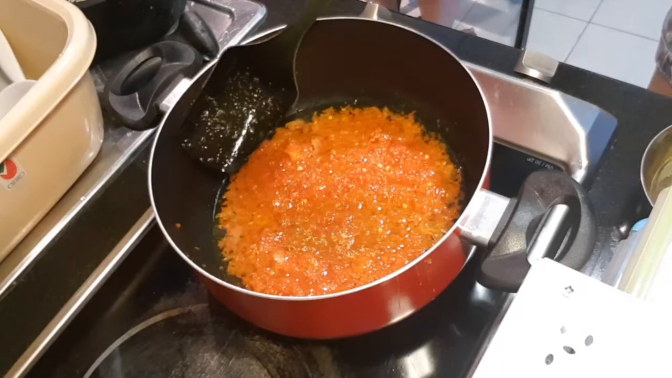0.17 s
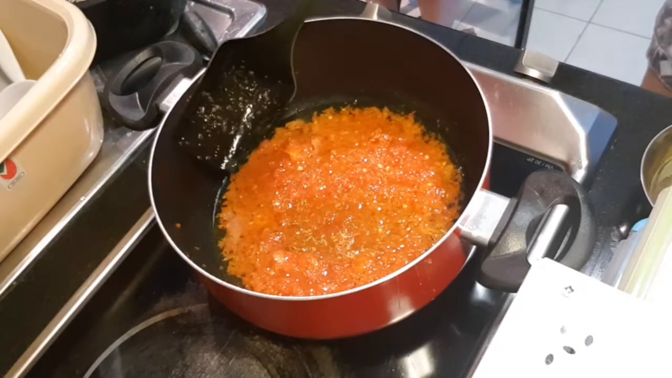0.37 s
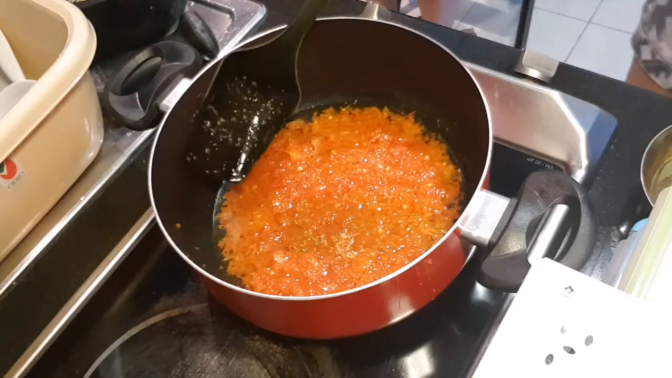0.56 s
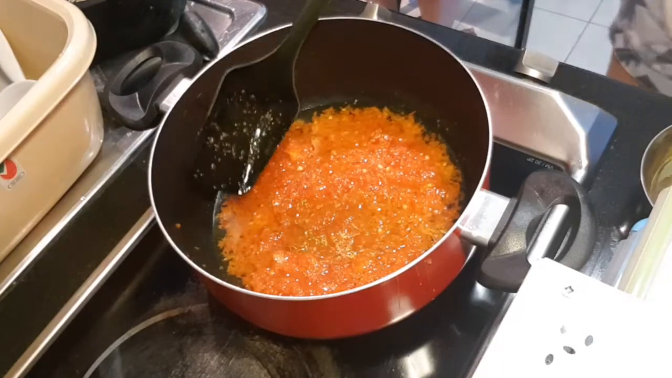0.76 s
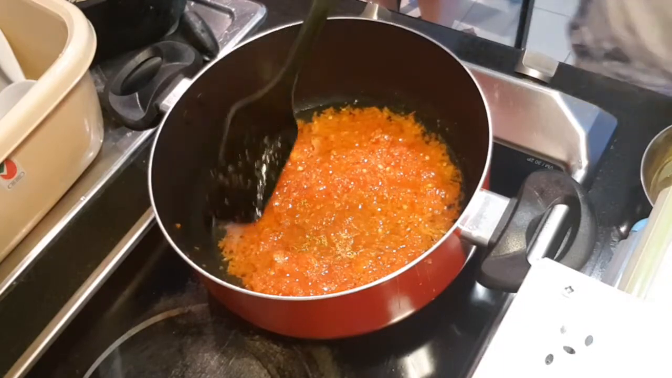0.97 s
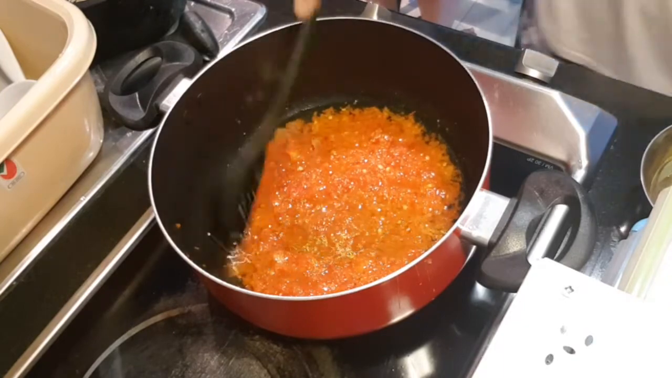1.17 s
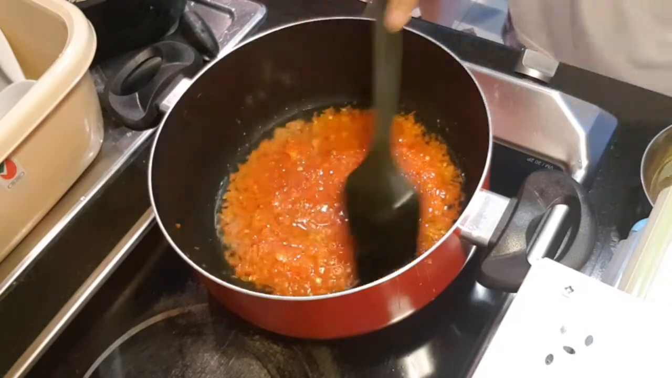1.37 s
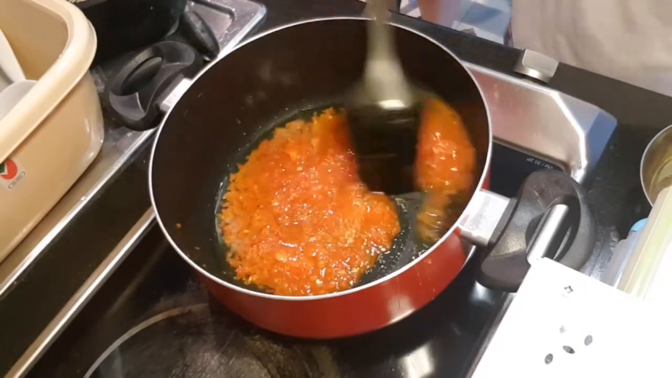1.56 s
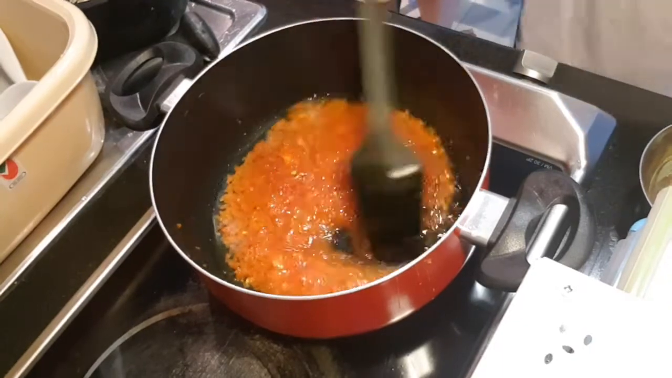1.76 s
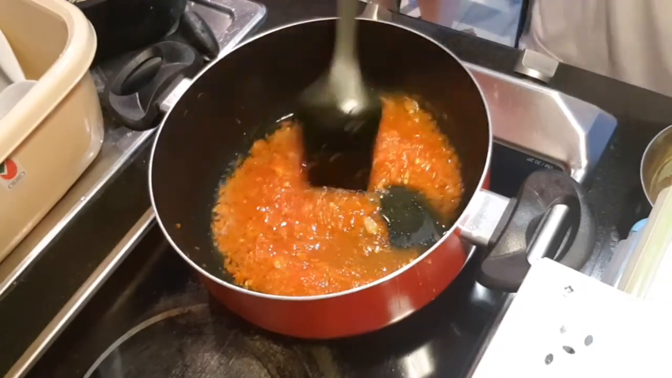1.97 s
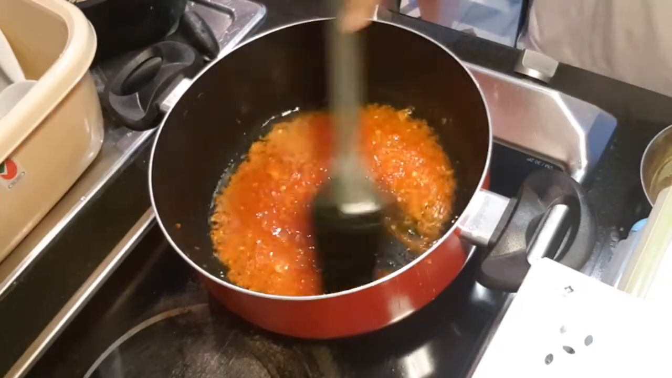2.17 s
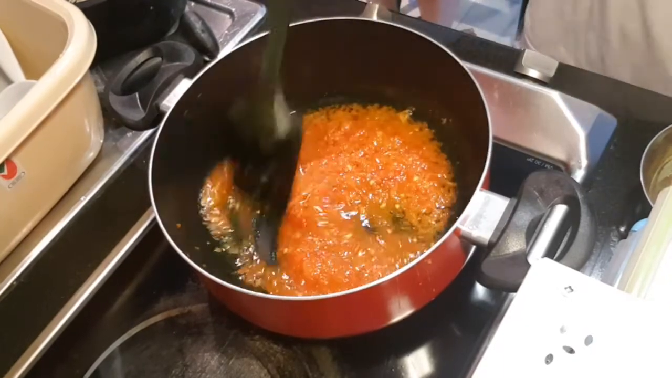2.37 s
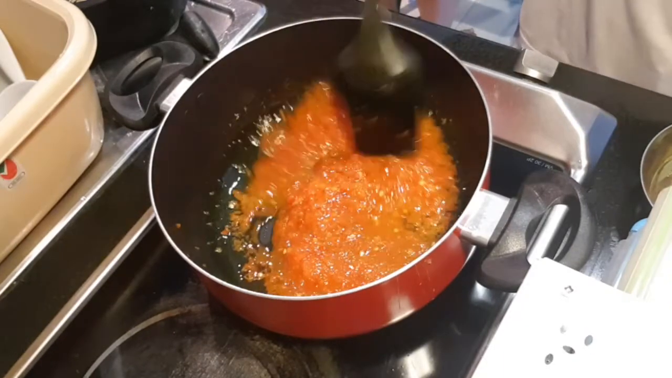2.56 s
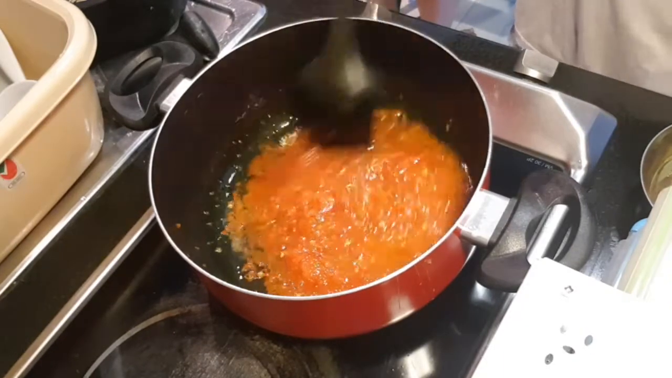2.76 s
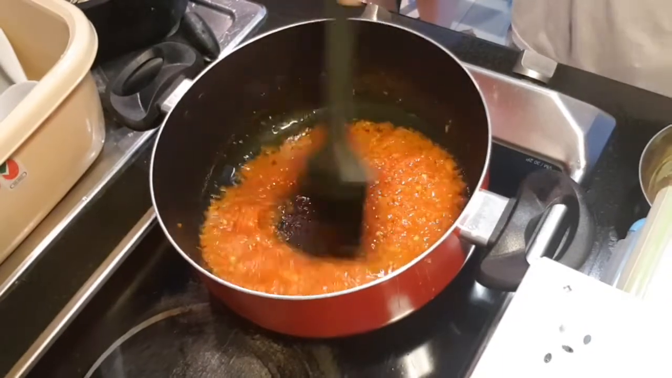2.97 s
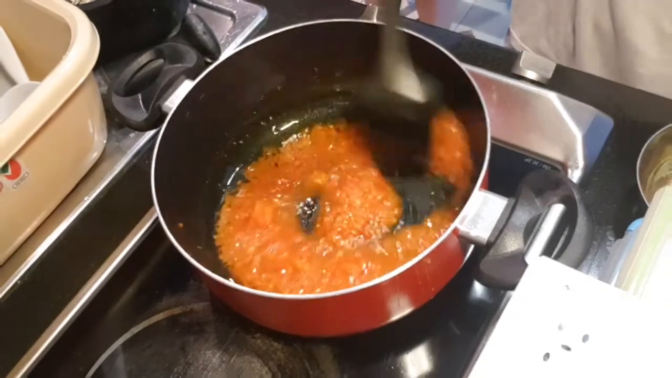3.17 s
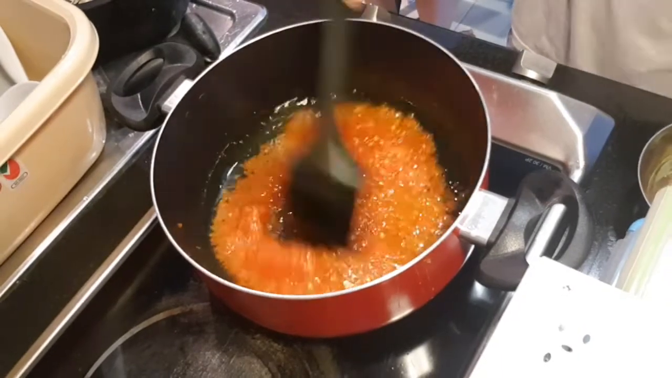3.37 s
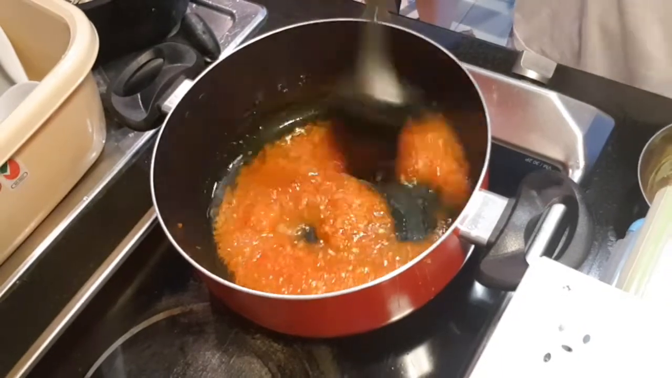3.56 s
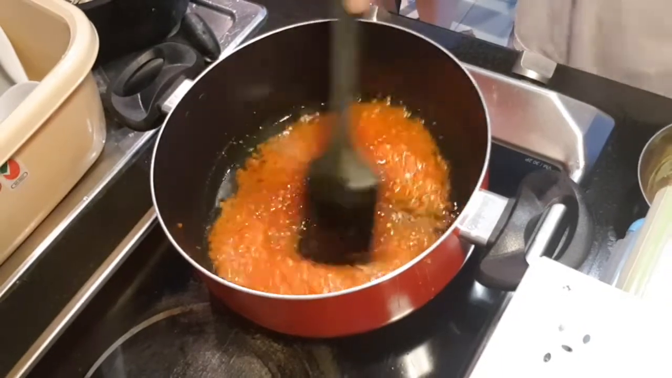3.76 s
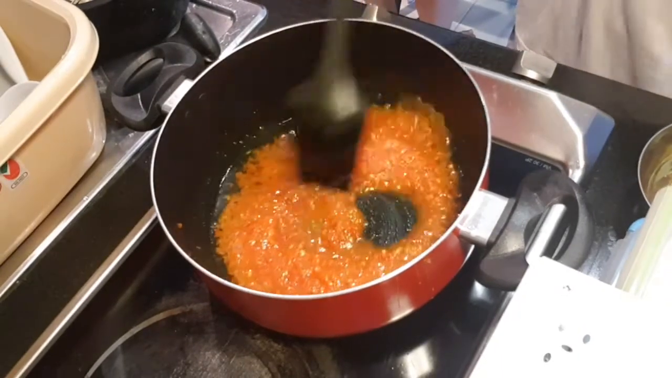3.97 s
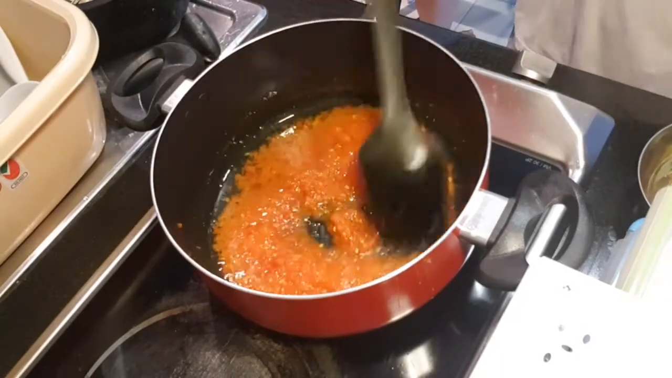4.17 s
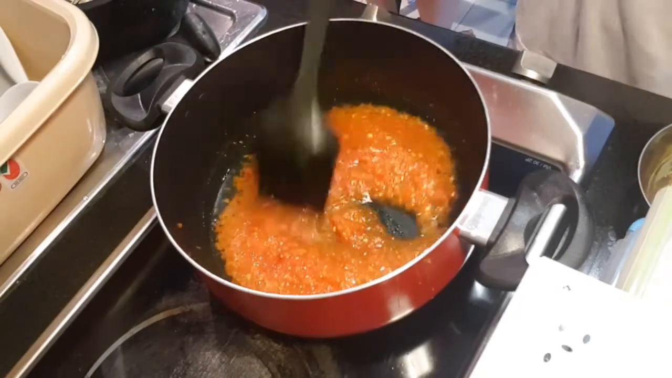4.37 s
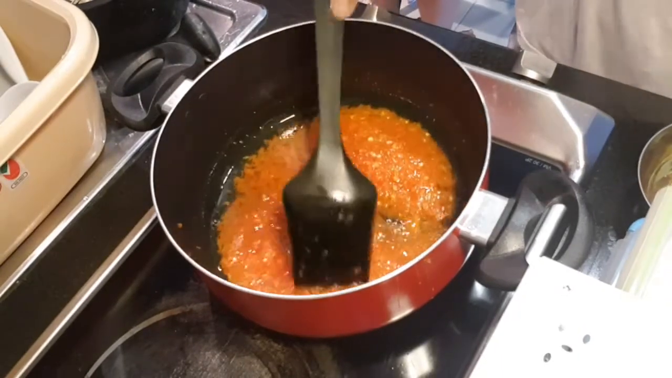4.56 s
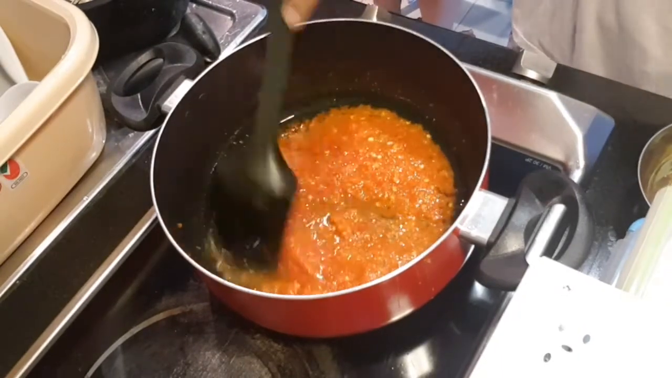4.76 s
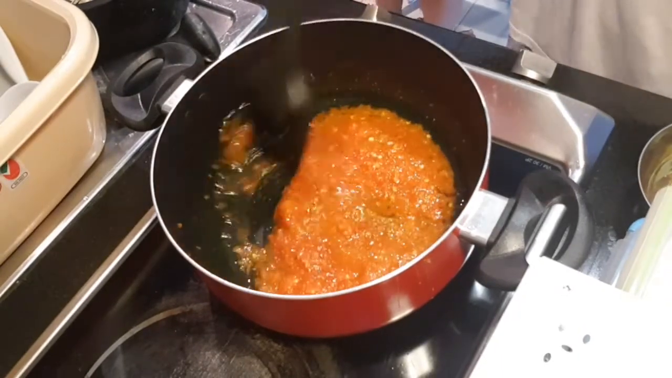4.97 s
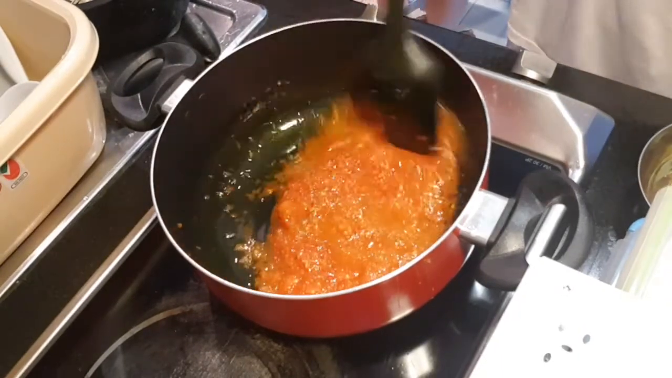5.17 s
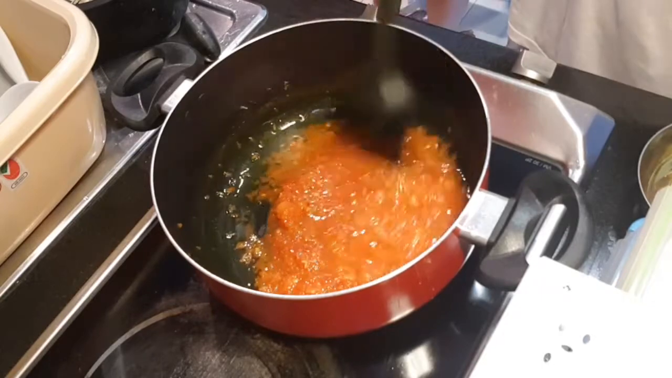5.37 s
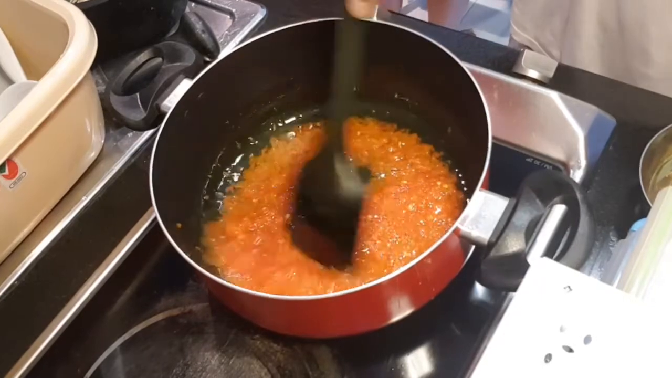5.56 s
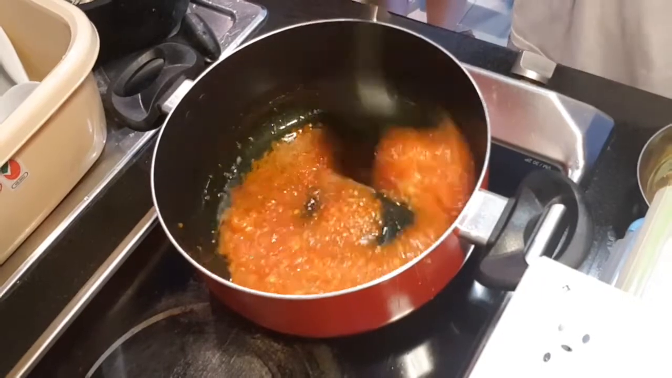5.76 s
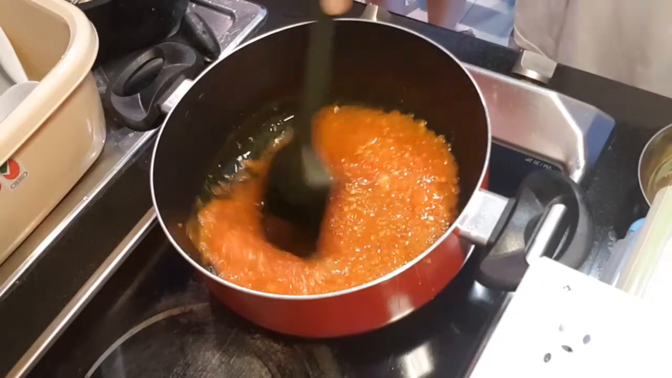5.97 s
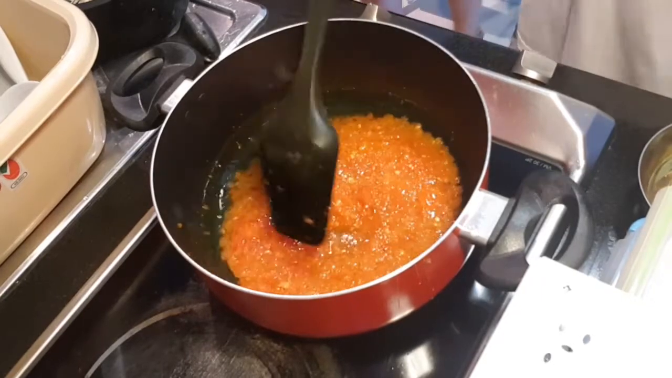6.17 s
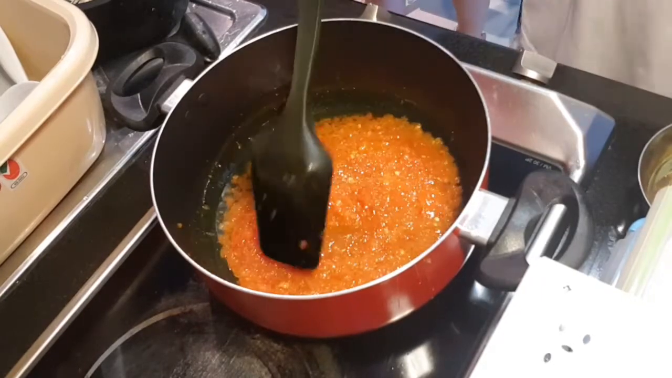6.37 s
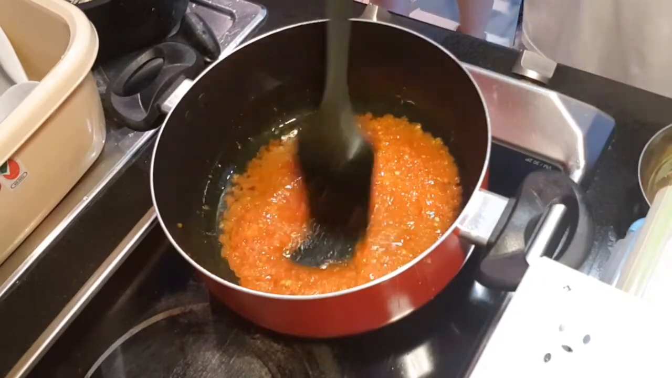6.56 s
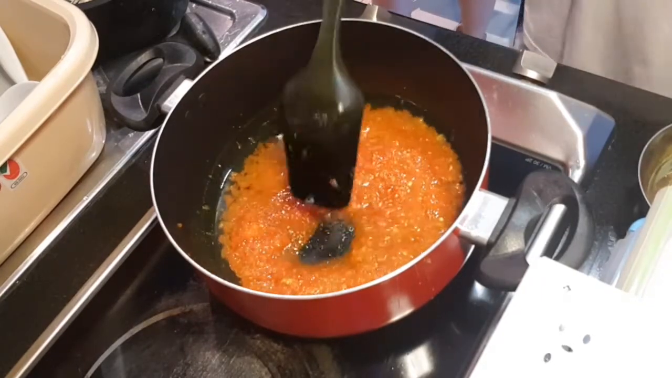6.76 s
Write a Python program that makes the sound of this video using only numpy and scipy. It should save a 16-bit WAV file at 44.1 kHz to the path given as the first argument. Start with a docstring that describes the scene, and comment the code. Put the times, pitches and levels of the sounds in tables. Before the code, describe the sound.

After a second of gentle frying, a nylon spatula knocks sharply in a nonstick pot and begins quick scraping strokes through thick paste. The sizzle flares, then subsides as stirring continues, with hollow clunks, brief bright clacks and wet squelches. Late on the strokes thin out to a soft knock and drag. A fan rumbles low in the home kitchen; close stereo pickup, leaning slightly left.

```python
"""Kitchen hob: a nylon spatula stirs a paste frying in a nonstick pot, heard by two microphones.
Rubbing strokes: dense random clicks drive damped pot modes, plus noise in soft bands.
Knocks: decaying sines of pot and hob with a burst of noise. Spits: band-passed noise puffs.
Sizzle: clicks and noise in flickering bands. Kitchen: shaped noise, fan rumble and faint hiss."""
import sys
import numpy as np
from scipy import signal
from scipy.fft import rfft, irfft, next_fast_len
from scipy.io import wavfile
from scipy.ndimage import uniform_filter1d

SR = 44100
rng = np.random.default_rng(int(sys.argv[2]) if len(sys.argv) > 2 else 0)


def pcm_store(signal):
    """Save signal as 16-bit PCM."""
    levels = np.round(np.clip(np.atleast_2d(signal), -1, 1) * 32767)
    wavfile.write(sys.argv[1], SR, levels.astype(np.int16).T)


N = 300321
T = np.arange(N) / SR
STEP = 32  # samples
SLOW_S = T[::STEP]  # coarse clock for gains
PAD = next_fast_len(N)
HZ = np.maximum(np.fft.rfftfreq(PAD, 1 / SR), 1)

# Blade strokes; levels are nominal, before slow random unevenness:
# touch_s, speed_up_s, slow_down_s, touch_softening_db, lift_softening_db,
# rub_db, low_modes_db, hiss_db (all at full speed), squelch_db (at touch),
# low_touch_hz, low_full_speed_hz, high_touch_hz, high_lift_hz, high_strength_db
STROKES = [(1.137, 0.11, 0.11, 16.4, 8.8, -41.5, -40, -63, -70, 530, 383, 1510, 2380, 4),
           (1.41, 0.061, .03, 5.7, 6.1, -46.5, -48, -49.5, -56, 489, 880, 2100, 2190, -0.5),
           (1.645, 0.0087, 0.041, 5.9, 6.6, -48, -46.5, -44.5, -58, 612, 610, 2070, 1990, -2),
           (1.729, 0.063, 0.037, 7.8, 4, -39.5, -46.5, -46.5, -47, 1120, 1160, 2810, 2290, 0),
           (1.921, 0.12, 0.045, 18, 6, -35.5, -46.5, -44.5, -58, 900, 960, 1730, 1940, -5.5),
           (2.104, 0.0075, 0.02, 1, 5.2, -39.5, -36, -45.5, -56, 558, 510, 2420, 2320, -3.5),
           (2.174, 0.0054, 0.017, 2, 3.6, -43, -45.5, -49.5, -60, 700, 790, 1620, 1630, -7),
           (2.271, 0.14, 0.051, 13, 5.4, -37.5, -43.5, -45.5, -58, 400, 880, 2750, 2100, 4),
           (3.071, 0.022, 0.012, 10, 8.3, -40.5, -61, -52, -48, 756, 750, 2210, 2290, 3.5),
           (3.215, 0.059, 0.11, 12.6, 10.7, -35, -41.5, -45.5, -38.5, 640, 1080, 2760, 1960, -1.5),
           (3.574, 0.1, 0.073, 14.4, 7.7, -35, -39, -47.5, -51, 565, 655, 1830, 2700, -0.5),
           (3.93, 0.11, 0.062, 15, 4.3, -38, -40, -52, -49, 690, 590, 1860, 2490, -2.5),
           (4.138, 0.071, 0.039, 14.5, 14, -38.5, -52.5, -48.5, -44, 770, 930, 1740, 2600, -0.5),
           (4.289, 0.066, 0.11, 13.4, 6.3, -38, -40.5, -54, -48, 680, 586, 1700, 2660, -2),
           (4.67, .015, 0.033, 0.67, 4, -56.5, -48, -74, -70, 415, 415, 2600, 2290, -1.5),
           (4.748, 0.039, 0.087, 15, 2.3, -40, -39.5, -53, -58, 1100, 733, 2730, 2370, -1.5),
           (4.855, 0.065, 0.13, 4.9, 5.2, -37, -44, -50, -64, 800, 1136, 1900, 1620, 2.5),
           (5.297, 0.012, 0.0069, 6.5, 1, -55, -59, -58, -68, 695, 800, 1700, 1700, -2.5),
           (5.318, .006, 0.015, 2.8, 3.7, -34, -36.5, -51, -46, 775, 780, 1650, 1650, 1.5),
           (5.481, 0.022, 0.025, 6, 3.9, -56.5, -52, -62, -55, 547, 566, 1960, 2000, 3.5),
           (5.765, 0.051, .012, 4.9, 1, -39.5, -41.5, -42.5, -46.5, 692, 1180, 2980, 2720, 0),
           (5.825, 0.0068, 0.044, 3, 1.1, -32.5, -49.5, -40, -60, 1150, 1220, 1740, 1900, 7.5),
           (6.513, 0.0056, 0.13, 6.6, 19, -58.5, -51.5, -62, -60, 395, 408, 2260, 2200, 19.5)]
# Soft drag of the blade through the paste between strokes: time_s, level_db
DRAG = [(1.05, -70.5), (1.35, -60.5), (1.58, -70), (1.9, -66.5), (2.2, -64), (2.55, -61), (2.66, -71.5),
        (2.78, -50), (2.9, -60.5), (3.45, -57.5), (3.55, -69), (3.88, -65.5), (4.3, -72), (4.62, -76),
        (4.7, -62), (5.2, -73.5), (5.45, -73), (5.72, -58.5), (5.95, -60), (6.12, -76.5), (6.81, -79.5)]
# Favoured modes while dragging: low_hz, high_hz
DRAG_HZ = (528, 2040)
# Share of the softening followed by rubbing, low modes, hiss: share [ratio]
SPEED_SHARE = [0.94, 0.78, 0.18]
# Blade knocks, relative levels at the colour points:
# start_s, ring_db, hob_thud_db, pot_floor_db, place_hz (pivot of the ring colour),
# dullness_db_per_oct (drop above the pivot)
KNOCKS = [(0.068, -44.5, -69, -48, 1500, 11), (0.246, -51, -70, -73, 1700, 5),
          (1.099, -53, -47.5, -65, 900, 7), (1.325, -12.5, -31.5, -14, 690, 15.5),
          (1.864, -60, -47, -43, 700, 10), (1.9, -27, -43, -23, 600, 18), (2.174, -38, -43, -22, 1200, 9),
          (2.211, -63, -43, -43, 1200, 3.5), (2.253, -64, -39, -29, 2200, 5.5),
          (2.675, -15.5, -32, -26, 2600, -0.5), (2.717, -24, -28.5, -19.5, 700, 4.5),
          (2.745, -19, -36, -44, 1290, 33), (3.44, -39, -45, -21.5, 700, 6.5),
          (3.577, -46.5, -68, -60, 1200, 0.5), (4.2, -55, -53, -27, 700, 6),
          (4.67, -63, -43, -34, 700, 4.5), (4.745, -41, -56, -31, 700, 5),
          (4.776, -22.5, -39, -40, 700, 15.5), (5.319, -30.5, -36, -63, 1650, 32),
          (5.361, -71, -50, -28.5, 1500, 20), (5.482, -59, -44.5, -77, 1200, 5),
          (5.77, -51.5, -49, -48.5, 2200, -6.5), (6.517, -34.5, -38.5, -19.5, 700, 31)]
# Colour points of a knock: thud, floor, then ring: centre_hz
KNOCK_POINTS_HZ = [130, 300, 700, 1700, 5600]
# Oil spits: start_s, level_db (before the fade), centre_hz, t60_s
SPITS = [(1.633, -19.5, 10750, 0.29), (3.411, -34, 9600, .1), (3.412, -34, 2890, .1),
         (3.413, -35, 4800, .1), (3.443, -37, 9900, 0.091), (4.505, -42.5, 7860, 0.21),
         (6.053, -47, 7100, 0.2), (6.095, -47, 10600, 0.34), (6.158, -44, 3500, 0.17),
         (6.159, -46, 5630, .19), (6.2602, -53, 5310, 0.29), (6.3194, -54.5, 4520, 0.21),
         (6.7403, -54, 4060, 0.29), (6.79, -55.5, 4240, 0.31)]
# Pot and hob modes: mode_hz, struck_rel_db, t60_s (before paste damping), rubbed_rel_db
POT = [(75.2, -10, 0.46, -20), (131.4, 9.5, 0.86, -12), (206.8, -2, 0.34, -2.5), (258.7, -13, 0.61, 2.5),
       (389.2, -7.5, 0.11, 9.5), (497, -15.5, 0.083, 6.5), (681.5, -7, 0.034, 4),
       (929.4, -11.5, 0.065, 3.5), (1112.5, -0.5, 0.13, 5.5), (1172, -1, 0.3, -17), (1621, 4, 0.11, 4),
       (1770, 5.5, 0.026, -3), (2076, -9.5, 0.21, -6), (2240, -11, 0.1, -5), (2616, -3, 0.34, -2.5),
       (2880, -10, 0.13, -9), (3227, -4, 0.18, -15), (3740, -12, 0.097, -13), (4310, -42, .1, -2.5),
       (5203, -5, 0.32, -14.5), (5150, -5.5, 0.24, -12.5), (5760, -2, 0.18, -36.5), (6230, -5.5, .15, -33),
       (6600, -3.5, 0.021, -41.5), (7210, 3.5, 0.047, -21.5), (9500, -10.5, 0.074, -23.5),
       (8980, 6, 0.04, -23.5), (10450, 1, 0.076, -0.5)]
# Relative spectrum of the rubbing rasp: point_hz, level_db (per Hz)
RUB = [(120, -59), (200, 2.5), (259, -13), (299, -15.5), (491, 0), (579, 4), (933, -6.5), (1450, -5.5),
       (1650, -15.5), (9930, -28.5), (16000, -47)]
# Relative spectrum of the sizzle: point_hz, level_db (per Hz)
SIZZLE = [(240, -6.5), (400, 0.5), (453, -15.5), (789, 1), (865, -8), (1160, -3.5), (1420, -10), (1790, -1),
          (1960, -6), (2800, -4), (4880, -9.5), (8240, -9), (16000, -15.5)]
# Sizzle flares where the blade bares hot metal, dies down as the paste cools the oil:
# time_s, level_db (before flicker), tilt_db_per_oct (limited to +-3 in use)
FRYING = [(0, -53, -1), (1.04, -52, -0.5), (1.6, -45, 0.5), (2.2, -43, -2.5), (2.6, -51, 0),
          (3.15, -51, -2), (3.87, -55, -1), (4.27, -48, -3), (4.55, -56.5, -2.5), (5.15, -71.5, 9),
          (5.599, -62.5, 1), (6.0, -59, 1.5), (6.199, -74, 1.5), (6.81, -68.5, 1)]
# Relative spectrum of the fan rumble: point_hz, level_db (per Hz)
FAN = [(13, -42), (22, -20.5), (43, -3), (71, -11), (97, 1.5), (124, -10.5), (151, -2), (174, -16),
       (247, -13), (311, -27), (340, -64.5), (484, -27), (1500, -89), (1950, -90), (3300, -120)]
# Relative spectrum of the room hiss: point_hz, level_db (per Hz)
HISS = [(590, -16.5), (1000, -15.5), (1930, -4), (3120, -34.5), (3590, 7), (15000, 2), (15900, -12),
        (16500, -19)]
# Level of the left channel over the right: point_hz, difference_db
LEFT_MINUS_RIGHT = [(60, 2.5), (110, 0.5), (200, 4.5), (380, 1.5), (700, 5), (1290, 2.5), (2380, 4.5),
                    (4400, 1), (8120, 4.5), (15000, -0.5)]

FAN_DB, HISS_DB = -49.5, -68.5
ALIKE_BELOW_HZ, TOP_HZ = 533, 15850
SLOW_PITCH = .8  # slowing blade favours lower modes: share of the full-speed pitch
TOUCH_S, LIFT_DB_PER_S = 0.0074, 447.5  # stroke onset; decay once the blade lifts
TAIL_DB, TAIL_DB_PER_S = -12, 162.5  # the kitchen's echo of a stroke
SWELL_POWER = 1.13  # 1 = even rise in dB, 2 = rounded top
DRAG_LOW_DB, DRAG_HISS_DB, DRAG_HIGH_DB = 4.5, -1, -1.5
SQUELCH_DB_PER_S = 300  # decay of the oil squelch under the landing blade
BELOW_PLACE_DB_PER_OCT, PASTE_DAMPING = -1, 1.35
CONTACT_MS, CONTACT_MS_PER_DB = 2.3, -0.26  # negative dullness lengthens contact


def rubbing():
    """The blade edge slips in dense tiny jerks; the pot's modes sing over a broad rasp."""
    (rub, low, hiss, squelch), (low_hz, high_hz), high = strokes()
    spectra = pair(unit(grit(9000, 0.57)), unit(grit(11000, 0.94)), 1)
    jerks = to_sound(spectra)
    rasp = shimmer(spectra * undb(along(RUB, HZ)))
    dull, mid, top = bands(rfft(rasp, PAD), [750, 3200])

    body = singing(jerks, POT[2:7], low_hz) + undb(-7) * unit(dull)
    low_wall = singing(jerks, POT[7:10], low_hz)
    high_wall = to_samples(high) * singing(jerks, POT[10:18], high_hz)
    wall = (low_wall + high_wall) / to_samples(np.hypot(1, high))
    wall = unit(wall) + undb(-5.5) * unit(mid)
    treble = unit(top)
    bright = unit(np.diff(treble[:, ::-1], prepend=0))  # each channel reversed in time

    uneven = undb(1.5 * np.array([walk(40) for _ in range(4)]))
    layers = zip((low, rub, hiss, squelch), uneven, (body, wall, treble, bright))
    return sum(to_samples(level * wobble) * sound for level, wobble, sound in layers)


def strokes():
    """Each stroke speeds up, slows down and lifts: gives layer gains, favoured Hz, high-mode gain."""
    drag_db = np.interp(SLOW_S, *np.transpose(DRAG))
    power = undb(2 * (drag_db + np.array([[0], [DRAG_LOW_DB], [DRAG_HISS_DB]])))
    squelch = np.zeros(len(SLOW_S))
    place = power[0] * np.c_[[*np.log(DRAG_HZ), DRAG_HIGH_DB]]
    for (touch_s, up_s, down_s, touch_db, lift_db, *full_db, squelch_db,
         touch_hz, full_hz, from_hz, to_hz, high_db) in STROKES:
        since_s = SLOW_S - touch_s
        starting = np.clip(1 - since_s / up_s, 0, 1)
        ending = np.clip((since_s - up_s) / down_s, 0, 1)
        onset = np.clip(since_s / TOUCH_S, 0, 1) ** 2
        lifted_s = np.maximum(since_s - up_s - down_s, 0)
        lifted_db = np.minimum(LIFT_DB_PER_S * lifted_s, TAIL_DB_PER_S * lifted_s - TAIL_DB)
        slow_db = touch_db * starting ** SWELL_POWER + lift_db * ending ** 2

        stroke = undb(2 * (np.c_[full_db] - np.c_[SPEED_SHARE] * slow_db - lifted_db)) * onset
        power += stroke
        fading_db = squelch_db - SQUELCH_DB_PER_S * np.maximum(since_s, 0) - lifted_db
        squelch += undb(2 * fading_db) * onset

        low_hz = full_hz * (touch_hz / full_hz) ** starting * SLOW_PITCH ** ending
        high_hz = from_hz * (to_hz / from_hz) ** np.clip(since_s / (up_s + down_s), 0, 1)
        colour = np.broadcast_arrays(np.log(low_hz), np.log(high_hz), high_db)
        place += stroke[0] * np.array(colour)
    place /= power[0]  # where strokes overlap, the louder one sets the colour
    return np.sqrt([*power, squelch]), np.exp(place[:2]), undb(place[2])


def singing(jerks, modes, centre_hz):
    """Jerks drive damped modes; those near the moving centre are favoured at constant power."""
    hz, db = np.array(modes)[:, [0, 3]].T[:, :, None]
    favour_db = 12 * np.exp(-(np.log(hz / centre_hz) / .13) ** 2)
    width_hz = 22 + .012 * hz
    gain = undb(db + favour_db + 3.5 * np.array([walk(22) for _ in modes]))
    gain /= np.sqrt((gain ** 2 * width_hz).sum(axis=0))
    total = 0
    for g, mode_hz, mode_width_hz in zip(gain, hz[:, 0], width_hz[:, 0]):
        b, a = signal.iirpeak(mode_hz, mode_hz / mode_width_hz, SR)
        total = total + to_samples(g) * signal.lfilter(b, a, jerks)
    return unit(total)


def shimmer(spectra):
    """Crowded small modes of the pot: three uneven combs of narrow peaks that take turns."""
    smooth_bins = int(70 * PAD / SR)  # 70 Hz
    combs = [unit(uniform_filter1d(rng.standard_normal(len(HZ)), smooth_bins)) for _ in range(3)]
    share = undb(6 * np.array([walk(14) for _ in combs]))
    share /= np.sqrt((share ** 2).sum(axis=0))
    parts = (to_samples(g) * to_sound(spectra * undb(7.4 * comb)) for g, comb in zip(share, combs))
    return unit(sum(parts))


def knocks():
    """Each blow rings the same damped modes, coloured by place, with a short crack of noise."""
    out, t = np.zeros((2, N + SR)), T[:SR // 2]
    hz, struck_db, t60_s, _ = np.array(POT).T[:, :, None]
    lag = np.arccos(alike(hz))  # short waves reach the microphones out of step
    start = 2.4 * np.arange(len(POT))[:, None] * (hz > 1000) + np.pi / 2 * (hz > 190)
    f = np.maximum(np.fft.rfftfreq(len(t), 1 / SR), 1)
    for start_s, db, thud_db, floor_db, place_hz, dull in KNOCKS:
        contact_ms = CONTACT_MS + np.clip(CONTACT_MS_PER_DB * dull, 0, 2.4)
        octaves = np.log2(np.array(KNOCK_POINTS_HZ[2:]) / place_hz)
        ring_db = db + np.where(octaves < 0, BELOW_PLACE_DB_PER_OCT, -dull) * octaves
        colour = list(zip(KNOCK_POINTS_HZ, [thud_db, floor_db, *ring_db]))
        colour += [(9500, ring_db[-1] - 8), (16000, ring_db[-1] - 26)]

        decay = np.exp(-np.log(1000) * t * PASTE_DAMPING / t60_s)
        gain = undb(struck_db + along(colour, hz) + 5.0) * decay
        gain = gain * (0.25 + 0.55 * np.exp(-t / 0.01))  # extra fast drop at first
        detuned_hz = hz * (1 + .002 * rng.standard_normal(hz.shape))
        turn = 2 * np.pi * detuned_hz * (t - contact_ms / 1000) + start
        ring = np.array([(gain * np.sin(turn + side * lag / 2)).sum(axis=0) for side in (1, -1)])

        noise = rfft(rng.standard_normal((2, len(t))))
        mid, side = noise * np.sqrt([1 + alike(f), 1 - alike(f)])
        fade = undb(13.5) * np.exp(-1000 * t) + undb(4.0) * np.exp(-t / 0.025)
        crack_gain = undb(along(colour, f) - 7.0) * f ** 2 / (f ** 2 + 500 ** 2)
        crack = irfft(np.array([mid + side, mid - side]) * crack_gain, len(t)) * fade

        rise = 1 - np.exp(-(t * 1000 / max(contact_ms, .2)) ** 2)
        i = int(start_s * SR)
        out[:, i:i + len(t)] += (ring + crack) * rise
    return out[:, :N]


def spits():
    """A water pocket bursts in the oil: a sharp puff of band-passed noise that fizzes out."""
    out, t = np.zeros((2, N + SR)), T[:SR // 4]
    for start_s, db, hz, t60_s in SPITS:
        edges_hz = [hz * 0.89, min(hz * 1.16, 19000)]
        sos = signal.butter(2, edges_hz, "band", fs=SR, output="sos")
        puff = unit(signal.sosfilt(sos, rng.standard_normal((2, len(t)))))
        burst = 0.5 * np.exp(-t / 0.0028)
        fizz = 0.18 * np.exp(-np.log(1000) * t / max(t60_s, .005))
        rise = 1 - np.exp(-t / 0.0015)
        i = int(start_s * SR)
        out[:, i:i + len(t)] += undb(db) * puff * (burst + fizz) * rise
    return out[:, :N]


def sizzle():
    """Countless tiny bubbles burst: clicks over noise, a shared swell, each band flickering alone."""
    time_s, db, tilt_db = np.transpose(FRYING)
    bubbles = [unit(grit(6000, 0.95)) + 1.25 * rng.standard_normal(N) for _ in range(2)]
    edges_hz = 700 * 2 ** np.arange(0, 4.6, .5)  # half octaves
    fizz = bands(pair(*bubbles, undb(along(SIZZLE, HZ))), edges_hz)
    scale = 1 / np.sqrt(np.mean(sum(fizz) ** 2))
    tilt = np.clip(np.interp(SLOW_S, time_s, tilt_db), -3, 3)
    level_db = np.interp(SLOW_S, time_s, db) + 0.4 * walk(2.7)
    total = 0
    for k, band in enumerate(fizz):
        band_db = level_db + 3.0 * walk(36) + tilt * (k / 2 - 2.0)
        total = total + to_samples(undb(band_db)) * band
    return scale * total


def kitchen():
    """A fan rumbles unevenly over a faint smooth hiss: two shaped noises."""
    rumble, hiss = (unit(to_sound(pair(*rng.standard_normal((2, N)), undb(along(spectrum, HZ)))))
                    for spectrum in (FAN, HISS))
    return to_samples(undb(FAN_DB + 1.2 * walk(4.9))) * rumble + undb(HISS_DB) * hiss


def grit(rate_hz, spread_db):
    """Random clicks of very unequal size."""
    hits = rng.random(N) < rate_hz / SR
    size_db = np.minimum(spread_db * rng.exponential(size=N), 24)
    return hits * rng.standard_normal(N) * undb(size_db)


def walk(rate_hz):
    """Random levels held 1 / rate_hz s, smoothed twice, on the coarse clock; spread near 1."""
    k = int(SR / STEP / rate_hz)
    held = np.repeat(rng.standard_normal(len(SLOW_S) // k + 1), k)
    return 1.3 * uniform_filter1d(uniform_filter1d(held, k), k)[:len(SLOW_S)]


def alike(hz):
    """Likeness of the two microphones: near 1 for long waves, 0 for short."""
    return .98 / (1 + (hz / ALIKE_BELOW_HZ) ** 6)


def pair(a, b, gain):
    """Left and right spectra from two unrelated sources, coloured by a gain per frequency."""
    mid = rfft(a, PAD) * np.sqrt(1 + alike(HZ))
    side = rfft(b, PAD) * np.sqrt(1 - alike(HZ))
    return np.array([mid + side, mid - side]) * gain


def bands(spectra, edges_hz):
    """Split a pair of spectra into sounds in bands with soft edges."""
    lows = [1 / (1 + (HZ / hz) ** 4) for hz in edges_hz]
    return [to_sound(spectra * (hi - lo)) for lo, hi in zip([0] + lows, lows + [1])]


def along(table, hz):
    """Read (Hz, dB) points on a log-frequency axis."""
    point_hz, db = np.array(table).T
    return np.interp(np.log(hz), np.log(point_hz), db)


def undb(db):
    """Decibels to amplitude ratio."""
    return 10 ** (np.asarray(db) / 20)


def unit(x):
    """Scale to an RMS of 1."""
    return x / np.sqrt(np.mean(x ** 2))


def to_sound(spectra):
    """Spectra to N samples."""
    return irfft(spectra, PAD)[..., :N]


def to_samples(gain):
    """Bring a gain from the coarse clock to every sample."""
    return np.interp(T, SLOW_S, gain)


def scene():
    """Sum of all sources."""
    return rubbing() + knocks() + spits() + sizzle() + kitchen()


def record(dry):
    """The left microphone faces the pot; the deep bass and the top are cut."""
    lean_db = np.array([[.5], [-.5]]) * along(LEFT_MINUS_RIGHT, HZ)
    gain = undb(lean_db) / np.sqrt(1 + (28 / HZ) ** 6)
    top_cut = signal.ellip(10, .2, 70, TOP_HZ, fs=SR, output="sos")
    return signal.sosfilt(top_cut, to_sound(rfft(dry, PAD) * gain))


dry = scene()
out = record(dry)
pcm_store(out)
```